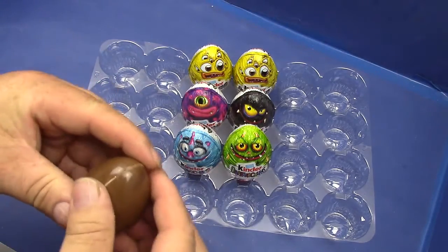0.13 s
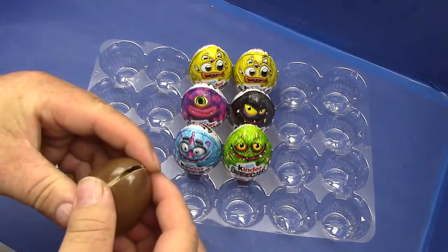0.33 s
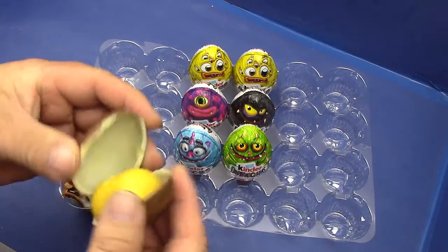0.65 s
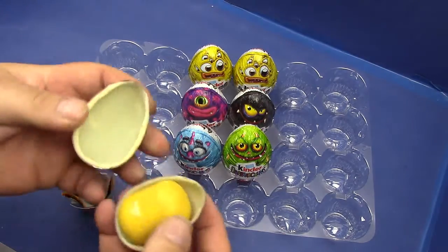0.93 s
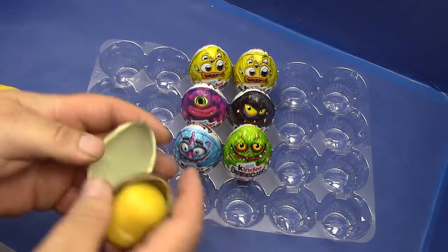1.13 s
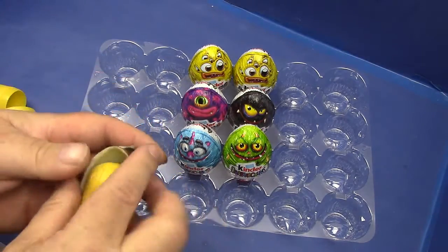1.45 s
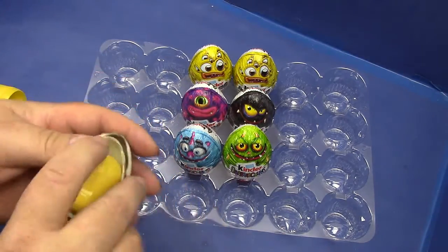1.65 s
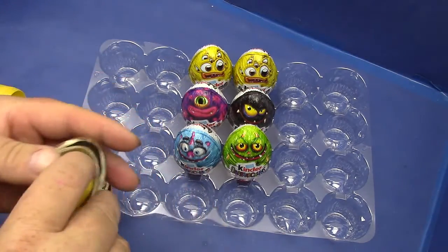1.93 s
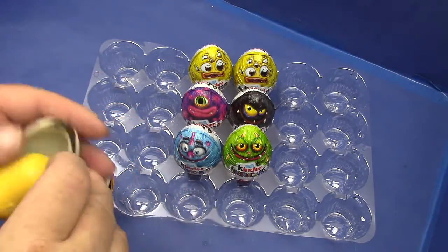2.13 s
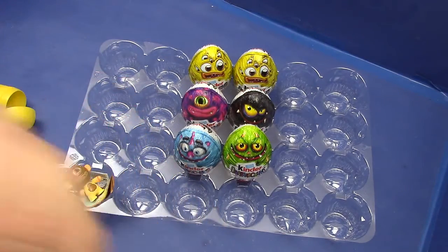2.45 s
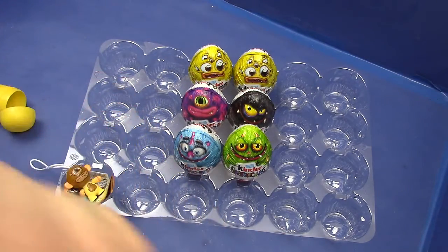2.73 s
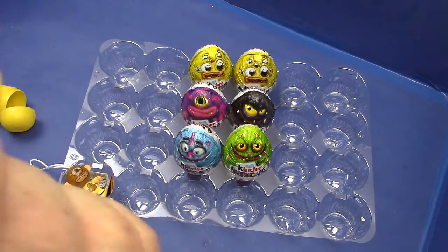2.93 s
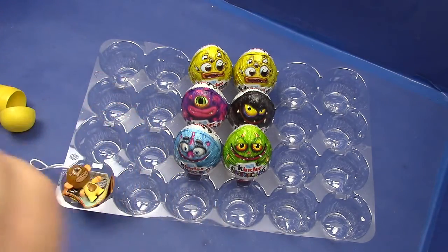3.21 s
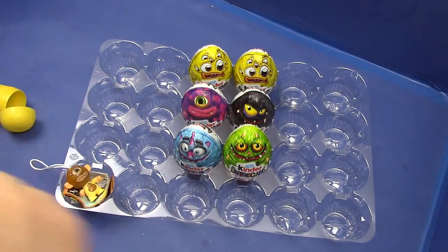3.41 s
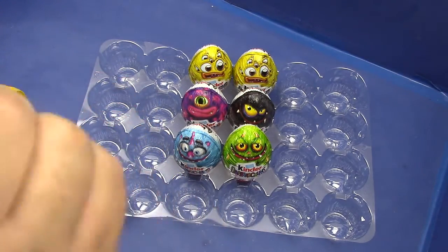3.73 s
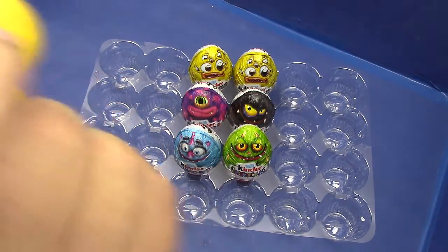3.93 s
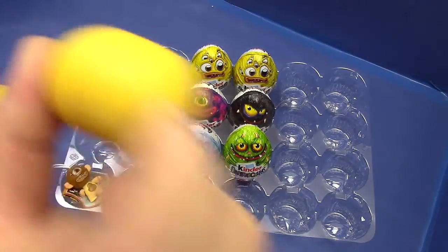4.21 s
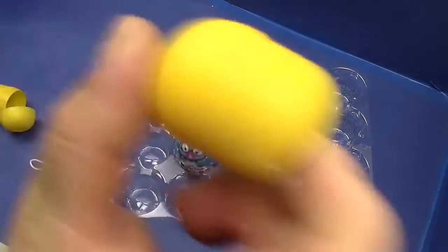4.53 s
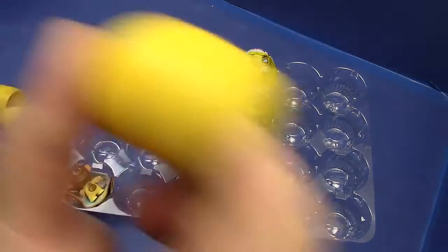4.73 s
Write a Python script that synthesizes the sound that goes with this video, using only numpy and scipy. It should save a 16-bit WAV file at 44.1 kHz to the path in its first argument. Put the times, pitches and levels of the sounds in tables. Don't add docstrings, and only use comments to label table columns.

```python
import sys
import numpy as np
from scipy import signal
from scipy.fft import rfft, irfft
from scipy.io import wavfile

SR = 44100
rng = np.random.default_rng(int(sys.argv[2]) if len(sys.argv) > 2 else 0)


def transcribe(u):
    v = np.clip(np.atleast_2d(u).T, -1, 1)
    q = np.round(v * 32767).astype(np.int16)
    wavfile.write(sys.argv[1], SR, q)


def boost(x):
    u = np.asarray(x, float) / 20
    return 10 ** u


N = 214546


def at_hz(points, hz):
    points_hz, values = np.array(points).T
    return np.interp(np.log(hz), np.log(points_hz), values)


def rms_one(x):
    return x / np.sqrt(np.mean(x ** 2) + 1e-20)


def peak_one(x):
    return x / (np.max(np.abs(x)) + 1e-12)


def band(x, low_hz, high_hz):
    edges_hz = [low_hz, min(high_hz, 0.45 * SR)]
    return signal.sosfilt(signal.butter(2, edges_hz, "band", fs=SR, output="sos"), x)


def resonate(x, hz, width_hz):
    r = np.exp(-np.pi * max(width_hz, 10) / SR)
    zeros = np.array([1, 0, -1]) * (1 - r * r) / 2
    poles = [1, -2 * r * np.cos(2 * np.pi * hz / SR), r * r]
    return signal.lfilter(zeros, poles, x)


def colour(x, points):
    size = 8192
    bins_hz = np.arange(1, size // 2 + 2) * SR / size
    cepstrum = irfft(np.log(boost(at_hz(points, bins_hz))))
    cepstrum[1:size // 2] *= 2
    cepstrum[size // 2 + 1:] = 0
    return irfft(rfft(x, size) * np.exp(rfft(cepstrum)))[:len(x)]


def burst(decay_s, rise_s, size=3000):
    t = np.arange(size) / SR
    envelope = (1 - np.exp(-t / rise_s)) * np.exp(-t / max(decay_s, 1e-4))
    return rng.standard_normal(size) * envelope


def grains(per_s, spread_db):
    sizes = boost(spread_db * np.minimum(rng.exponential(1, N), 5))
    signs = rng.choice([-1, 1], N)
    return sizes * signs * (rng.random(N) < per_s / SR) + 1e-18


def add(bus, s, sound):
    i = round(s * SR)
    bus[i:i + len(sound)] += sound[:N - i]


def like(smooth, sound):
    return rms_one(smooth) * np.sqrt(np.mean(sound ** 2))


def stereo_noise(size):
    white = rng.standard_normal((2, 2, size + SR // 4))
    edges_hz = 25 * 2 ** np.arange(0, 9.7, 1 / 3)
    out = []
    for k, (low, high) in enumerate(zip(edges_hz, edges_hz[1:])):
        out.append((np.sqrt(low * high), band(white[k % 2], low, high)[:, -size:]))
    return out


def air():
    # frequency [Hz], density [dB per Hz].
    air_spectrum = [(15, -48), (25, -25.5), (43, -19.5), (97, -2), (207, 1), (357, 2), (1110, -7),
                    (1350, -5), (2650, -13.5), (3670, -13), (9750, -22.5), (14700, -30.5), (16300, -33)]
    # frequency [Hz], left-right likeness [0..1].
    likeness = [(60, 0.22), (180, 0.27), (550, 0.49), (1650, 0.74), (4970, 0.78), (15000, 0.86)]
    out = 0
    for hz, (mid, side) in stereo_noise(N):
        alike = np.clip(at_hz(likeness, hz), 0, 0.99)
        pair = np.sqrt(1 + alike) * mid + np.sqrt(1 - alike) * side * [[1], [-1]]
        out = out + boost(at_hz(air_spectrum, hz)) * pair
    return boost(-56) * rms_one(out)


def whine():
    hz = 5500
    narrow = resonate(rng.standard_normal(N), hz, 24)
    return boost(-80) * rms_one(resonate(narrow, hz, 60))


def room(x, side_db, table_s):
    # frequency [Hz], reverberation time T60 [s].
    room_t60 = [(130, 0.22), (400, 0.71), (1300, 0.63), (3500, 0.56), (9000, 0.31), (15000, 0.25)]
    t = np.arange(SR * 3 // 4) / SR
    build_up = 1 - np.exp(-t / 0.0017)
    table = 1 + 3.93 * np.exp(-t / table_s)
    tail = 0
    for hz, (mid, side) in stereo_noise(len(t)):
        decay = boost(-60 * t / at_hz(room_t60, hz)) * table
        side_gain = boost(side_db) * (hz / 1500) ** 0.45
        tail = tail + decay * build_up * (mid + side_gain * side * [[1], [-1]])
    tail = tail / np.sqrt(np.sum(tail ** 2) / 2)
    return signal.fftconvolve(x[None], tail, axes=1)[:, :N]


def tray():
    # time [s], level [dB].
    slide_levels = [(1.93, -69), (2.024, -58.5), (2.16, -61), (2.246, -54.5), (2.406, -59.5), (2.596, -60),
                    (2.75, -70)]
    # mode [Hz], width [Hz], level [dB].
    tray_modes = [(465, 49, 3.5), (522, 44, 2.5), (334, 26, 0)]
    noise = rng.standard_normal(N)
    hum = 0
    for hz, width_hz, db in tray_modes:
        hum = hum + boost(db) * resonate(resonate(noise, hz, width_hz), hz, width_hz)
    times_s, levels_db = np.array(slide_levels).T
    t = np.arange(N) / SR
    gate = np.clip(np.minimum(t - times_s[0], times_s[-1] - t) / 0.014, 0, 1)
    return gate * boost(np.interp(t, times_s, levels_db)) * rms_one(hum)


def rubbing(ring_q, edge_s):
    # start [s], end [s], hollow-body level [dB], resonance [Hz], skin hiss [dB].
    rubs = [(0.42, 0.482, -55, 1940, -57), (0.582, 0.607, -56, 2700, -51), (0.63, 0.702, -52, 3500, -48),
            (0.82, 0.843, -40, 4100, -54), (1.08, 1.108, -66, 2000, -53), (1.106, 1.153, -62, 2030, -54),
            (1.59, 1.67, -62, 4700, -54.5), (1.792, 1.833, -51.5, 3530, -52),
            (1.963, 1.995, -45, 3200, -50.5), (1.983, 2.038, -58, 3020, -55.5),
            (2.078, 2.146, -43.5, 2100, -45)]
    # start [s], end [s], hollow-body level [dB], resonance at start, at end [Hz].
    squeezes = [(0.182, 0.262, -54, 870, 950), (0.258, 0.297, -49.5, 1260, 1220),
                (2.059, 2.099, -42.5, 2700, 2330), (2.063, 2.187, -51.5, 2090, 2080),
                (3.208, 3.252, -58.5, 4530, 5070), (4, 4.256, -55.5, 1520, 1394),
                (4.3, 4.376, -61.5, 1480, 1410)]
    # start [s], end [s], level [dB], centre [Hz], skin hiss [dB].
    rustles = [(0.156, .32, -57.5, 2420, -80), (0.62, 0.726, -49, 1470, -73), (0.766, 0.8, -56, 2490, -61),
               (1.077, 1.206, -73, 2000, -64), (1.304, 1.339, -43, 1990, -51),
               (1.525, 1.758, -60.5, 4500, -58.5), (1.92, 2.32, -54.5, 2670, -65),
               (2.31, 2.796, -56.5, 2320, -63), (3.032, 3.097, -63.5, 2000, -63),
               (3.15, 3.423, -56.5, 2300, -92.5), (3.212, 3.248, -60.5, 3730, -78.5),
               (3.571, 3.725, -52, 1458, -68.5), (3.799, 3.917, -49.5, 1240, -72),
               (4.155, 4.312, -55.5, 2780, -81), (3.929, 4.45, -59.5, 340, -90.5)]
    out = np.zeros(N)
    slips, fine = grains(5000, spread_db=3.5), grains(8000, spread_db=1.5)
    hiss = rms_one(resonate(fine, 9230, 1700) + 0.71 * band(fine, 2350, 8600))
    broad_hiss = rms_one(band(slips, 4400, 11500))

    strokes = [(start, end, db, hz, hz, hiss_db) for start, end, db, hz, hiss_db in rubs]
    strokes += [(*row, row[2] - 29) for row in squeezes]
    for start, end, body_db, hz, end_hz, hiss_db in strokes:
        span = slice(round(start * SR), round(end * SR))
        t = np.arange(span.stop - span.start) / SR
        gate = np.clip(np.minimum(t / 2, end - start - t) / edge_s, 0, 1)
        first, last = (rms_one(resonate(resonate(slips[span], f, f / ring_q), f, f / 2))
                       for f in (hz, end_hz))
        way = t / (end - start)
        body = (1 - way) * first + way * last
        out[span] += gate * (boost(body_db) * body + boost(hiss_db) * hiss[span])

    for start, end, body_db, hz, hiss_db in rustles:
        span = slice(round(start * SR), round(end * SR))
        swell = np.sqrt(np.hanning(span.stop - span.start))
        body = rms_one(band(fine[span], hz / 3.8, hz * 1.38))
        out[span] += swell * (boost(body_db) * body + boost(hiss_db) * broad_hiss[span])
    return out


def ticks(slide_s, push_s, stop_hz):
    # time [s], thud peak [dB], rasp peak [dB], hiss peak [dB].
    tick_events = [(2.581, -40.5, -41, -52), (2.764, -40.5, -44, -52), (2.934, -39.5, -51, -52),
                   (3.107, -41, -49.5, -55), (3.294, -43, -47, -66), (3.463, -42.5, -44.5, -54.5),
                   (3.644, -42, -36.5, -52), (4.002, -40, -44, -53), (4.076, -54, -49, -59),
                   (4.172, -38.5, -42.5, -42), (4.344, -42.5, -41, -43.5), (4.412, -52, -49, -56.5),
                   (4.517, -46.5, -44, -52.5), (4.596, -49, -50, -58), (4.692, -45, -35, -44.5),
                   (4.759, -49, -49, -55.5), (4.856, -45, -41, -45.5)]
    out, t = np.zeros(N), np.arange(2000) / SR
    swell = (t / slide_s) ** 0.42 * np.clip((slide_s - t) / 0.0012, 0, 1)
    push = (t / push_s) ** 1.1 * (t < push_s)
    thud = peak_one(band(push, stop_hz / 1.6, stop_hz * 4.4))
    for s, thud_db, rasp_db, hiss_db in tick_events:
        noise = swell * rng.standard_normal(len(t))
        rasp = resonate(noise, 3600, 460) + 1.07 * resonate(noise, 1330, 540)
        hiss = resonate(noise, 8900, 2500) + 0.2 * band(noise, 3500, 13500)
        add(out, s - 0.004, boost(rasp_db) * peak_one(rasp) + boost(hiss_db) * peak_one(hiss))
        add(out, s + 0.00757, boost(thud_db) * thud)
    return out


def clicks(ring_q, ring_s, crack_s, thump_hz):
    # time [s], peak [dB], ring [Hz], crack re peak [dB].
    near_clicks = [(0.2628, -36.5, 1230, -15), (0.517, -41.5, 2130, 6), (1.128, -38, 1571, -15),
                   (2.008, -33, 3080, -17), (2.584, -42, 1390, -3), (4.5305, -42, 1695, -12),
                   (4.597, -49, 1495, 0), (4.698, -34, 470, -3)]
    # time [s], peak [dB], ring [Hz], crack re peak [dB].
    hand_clicks = [(0.4106, -55, 740, 7), (0.4363, -35.5, 3620, -3), (0.5711, -28, 2500, -9),
                   (0.5961, -40.5, 620, -8), (0.675, -32.5, 730, 0), (0.695, -34, 2300, 3),
                   (0.8054, -38, 2400, -4), (0.8328, -31, 1030, 1), (1.3426, -24, 2000, -8),
                   (1.3476, -17, 2600, -1.5), (1.838, -43, 1670, -8), (1.979, -39, 3050, -15),
                   (1.9981, -46.5, 1240, -1), (2.114, -43, 2050, -3), (2.3285, -31, 1700, -41),
                   (2.3448, -33, 1540, 6.5), (2.3918, -34, 980, 4)]
    # time [s], peak [dB], ring [Hz], crack re peak [dB].
    hidden_clicks = [(1.148, -53, 3370, -1), (1.787, -55, 1937, -1), (1.911, -58.5, 1570, 5),
                     (3.189, -55, 2500, -11), (3.5145, -65, 796, 9), (3.73, -54.5, 1410, 0),
                     (3.8343, -59, 735, 2)]
    places = ((near_clicks, -27), (hand_clicks, -11), (hidden_clicks, 2.5))
    events = sorted((*row, room_db) for rows, room_db in places for row in rows)
    out, impulse = np.zeros((2, N)), signal.unit_impulse(3000)
    push = peak_one(band(impulse, thump_hz / 1.65, thump_hz * 4.0))

    def hollow(x, hz):
        body = resonate(x, hz, hz / ring_q) + 0.25 * band(x, 550, 3500)
        return band(body, 330, hz + 1800)

    def bright(x):
        return band(band(x, 3000, 8300), 2900, 14150)

    for s, db, hz, crack_db, room_db in events:
        thump_db = min(-38 - db + 0.15 * db, 3)
        thump = boost(thump_db) * push
        ring = peak_one(hollow(impulse + 0.28 * burst(ring_s, rise_s=0.0001), hz))
        crack = boost(crack_db) * peak_one(bright(burst(crack_s, rise_s=0.00005)))
        diffuse = like(hollow(impulse, hz), ring) + like(bright(impulse), crack) + thump
        add(out[0], s - 0.0002, boost(db) * (ring + crack + thump))
        add(out[1], s - 0.0002, boost(db + room_db) * diffuse)
    return out


def snaps():
    # time [s], peak [dB], fracture length [s], room feed [dB], first break re fracture noise [ratio].
    blows = [(0.0554, -24.5, 0.0023, -12.5, 3.6), (.6370, -19.5, 0.0039, -17, 5.4),
             (0.8792, -7.5, 0.00016, -23, 2.4), (0.8798, 3, 0.00047, -8.5, 2.36),
             (0.8807, -7, 0.0005, -21.5, 2.4), (1.3042, -5.5, 0.0024, -12.5, 10.3),
             (1.3530, -0.5, 0.0047, -11.5, 4.2), (1.5021, -9, 0.0026, -9, 7.2),
             (2.2543, -16, 0.00069, -8.5, 5.2), (3.2927, -37.5, 0.00079, 3, 4.9),
             (3.5877, -34, 0.0007, 2, 6), (3.8607, -21.5, 0.0024, 2, 0.85)]
    # frequency [Hz], density [dB per Hz].
    first_press = [(180, -36), (300, -22), (616, -5), (1970, -12.5), (3220, -20.5), (4470, -30),
                   (4930, -30), (9640, -29), (15000, -43)]
    seam_crack = [(180, -31), (300, -13), (587, -1.5), (884, -16.5), (1310, 4.5), (2870, -11), (3670, 6.5),
                  (4390, -23.5), (8320, -7), (15000, -23)]
    shell_split = [(290, -34), (500, -18), (678, -20), (1060, -8.5), (1280, -7), (1420, -5.5), (1870, -4),
                   (2010, -5.5), (2160, -2), (3490, 1), (4030, -2), (6100, -3.5), (6900, -10.5),
                   (12500, -11.5), (16000, -30.5)]
    shell_knock = [(240, -45), (400, -21), (780, -13), (979, -2.5), (1740, -6.5), (2090, 5.5), (3150, -5.5),
                   (4390, -32.5), (8300, -32.5), (15000, -32)]
    capsule_pop = [(150, -84), (250, -42), (330, -20), (367, -35), (421, -30), (662, -29), (723, -41.5),
                   (1350, -10.5), (1700, -18), (1880, -0.5), (2320, -14), (3170, -16.5), (9330, -24),
                   (12500, -27), (16000, -38)]
    capsule_slip = [(290, -74), (500, -20.5), (1000, -10), (1230, -22), (1520, 1.5), (2100, 5.5),
                    (2430, -5), (4470, -10.5), (12500, -19), (15000, -19)]
    capsule_tap = [(350, -84), (600, -41), (725, -26), (1040, -21), (1100, -25), (1630, -13.5),
                   (1890, -2.5), (3020, -24.5), (5250, -28.5), (15000, -43.5)]
    table_tap = [(350, -39.5), (600, -16), (1320, -10), (1500, -19.5), (1760, 3), (2020, 2), (3340, -6),
                 (6830, -29), (12000, -25), (15600, -66), (22000, -120)]
    table_knock = [(180, -47.5), (300, -31.5), (469, -32), (548, 5), (620, -26), (1030, 1.5), (1150, -4),
                   (2230, -15), (2690, -17.5), (12000, -49), (15600, -78), (22000, -120)]
    capsule_knock = [(65, -40), (110, -8), (157, -23), (210, 0.5), (293, -28), (332, -12), (536, -1.5),
                     (796, -10.5), (902, -0.5), (1130, -5), (1490, 2.5), (1690, -6.5), (4400, -13.5),
                     (13800, -37), (16000, -50)]
    bodies = (first_press, seam_crack, shell_split, shell_split, shell_split, shell_knock,
              capsule_pop, capsule_slip, capsule_tap, table_tap, table_knock, capsule_knock)
    out, impulse = np.zeros((2, N)), signal.unit_impulse(3000)
    for (s, db, decay_s, room_db, first), body in zip(blows, bodies):
        fracture = first * impulse + burst(decay_s, rise_s=0.0001)
        sound = boost(db) * peak_one(colour(fracture, body))
        add(out[0], s, sound)
        add(out[1], s, boost(room_db) * like(colour(impulse, body), sound))
    return out


def scene():
    direct, feed = clicks(ring_q=2.4, ring_s=0.0023, crack_s=0.00054, thump_hz=420) + snaps()
    friction = rubbing(ring_q=12.0, edge_s=0.016) + tray()
    close = ticks(slide_s=0.0129, push_s=0.00205, stop_hz=205)
    reflections = room(feed * boost(6.5) + boost(-5.5) * friction, side_db=-19, table_s=0.0053)
    hands = direct + friction + close + reflections
    dulled = signal.sosfilt(signal.butter(2, 12500, fs=SR, output="sos"), hands)
    return dulled + air() + whine()


def band_limit(x):
    return signal.sosfilt(signal.butter(12, 16480, fs=SR, output="sos"), x)


def record(dry):
    clipped = np.clip(dry, -0.9, 0.9)
    top_cut = signal.cheby2(14, 60, 16600, fs=SR, output="sos")
    return band_limit(signal.sosfilt(top_cut, clipped))


dry = scene()
out = record(dry)
transcribe(out)
```